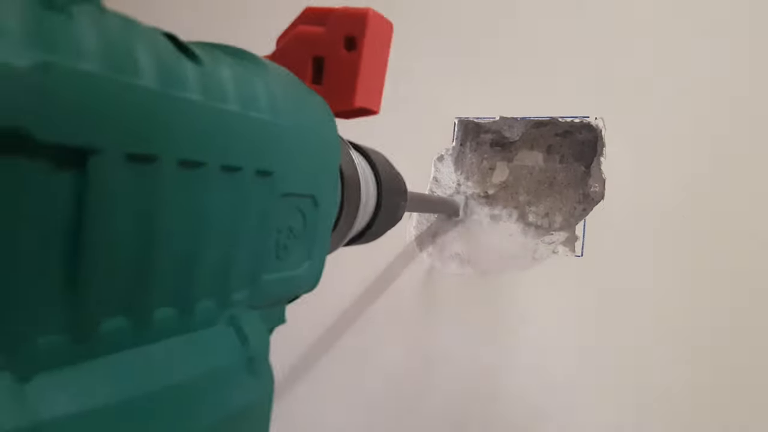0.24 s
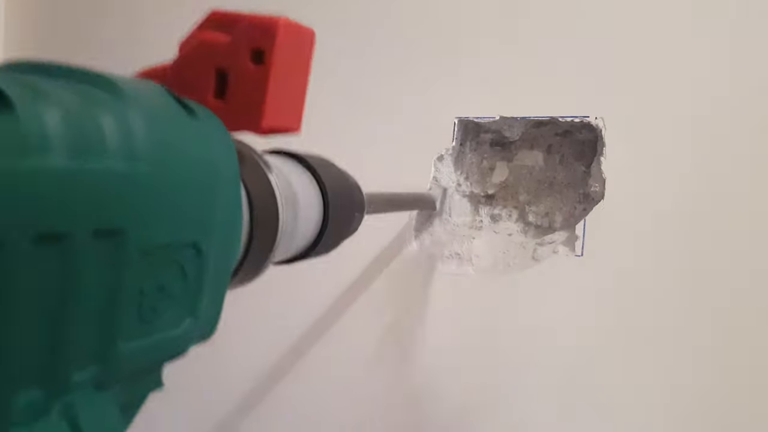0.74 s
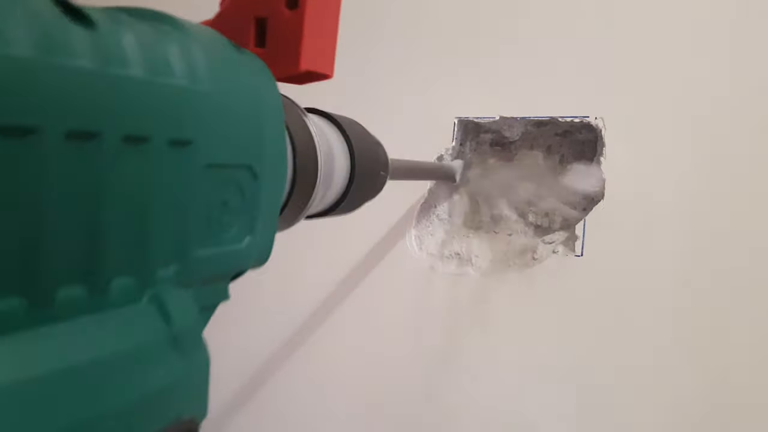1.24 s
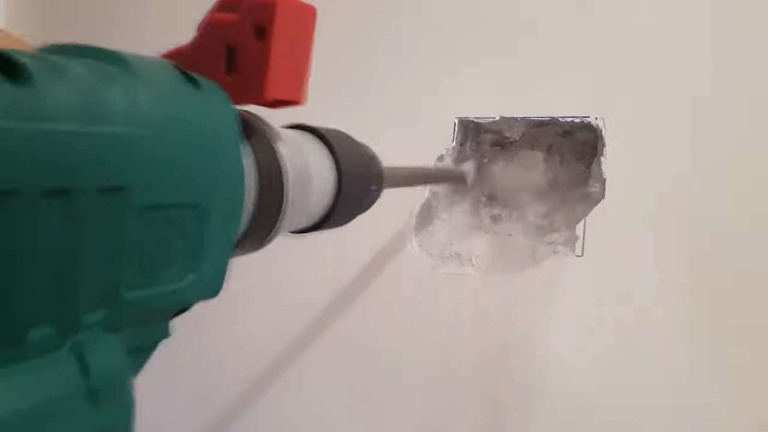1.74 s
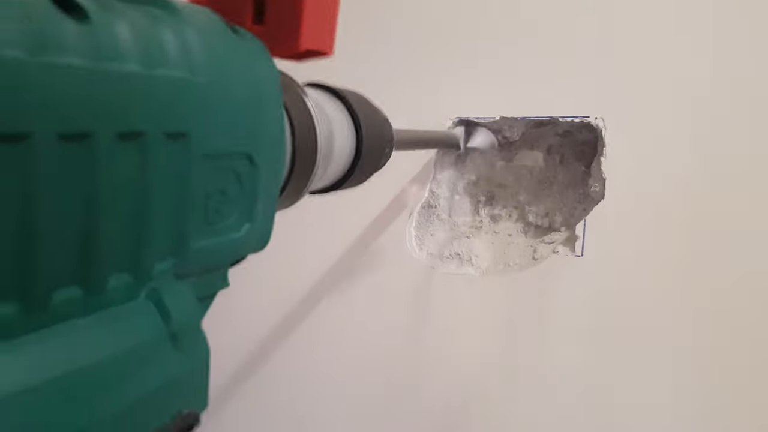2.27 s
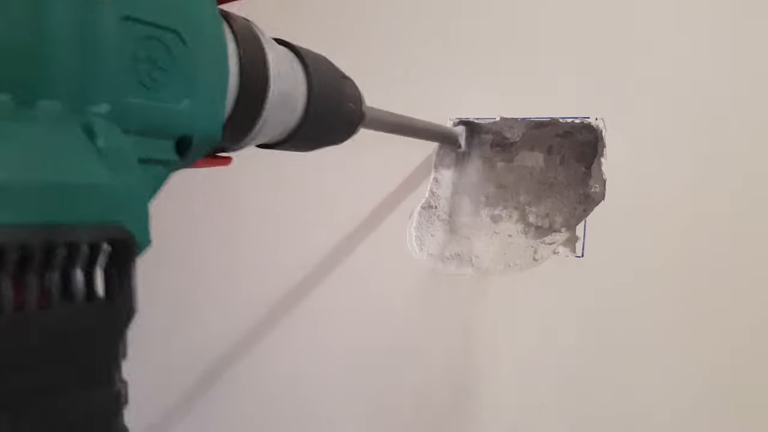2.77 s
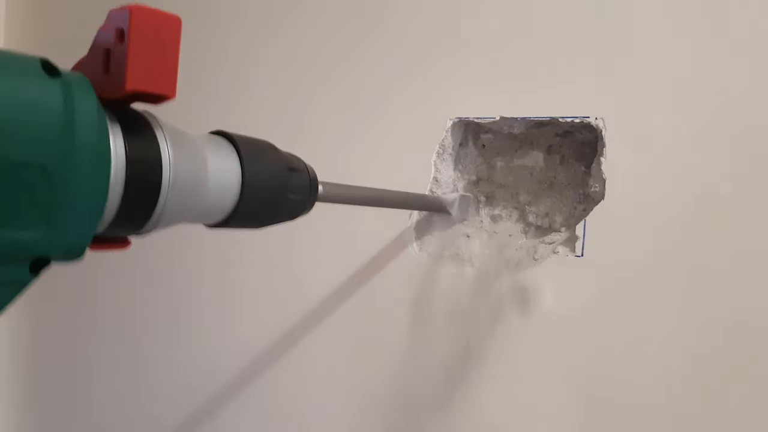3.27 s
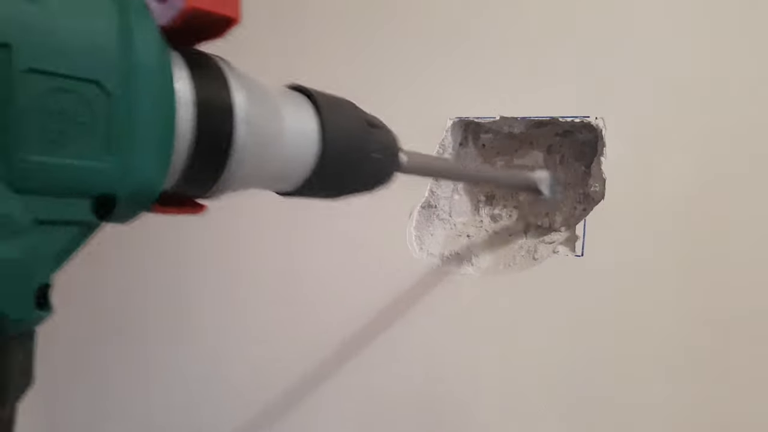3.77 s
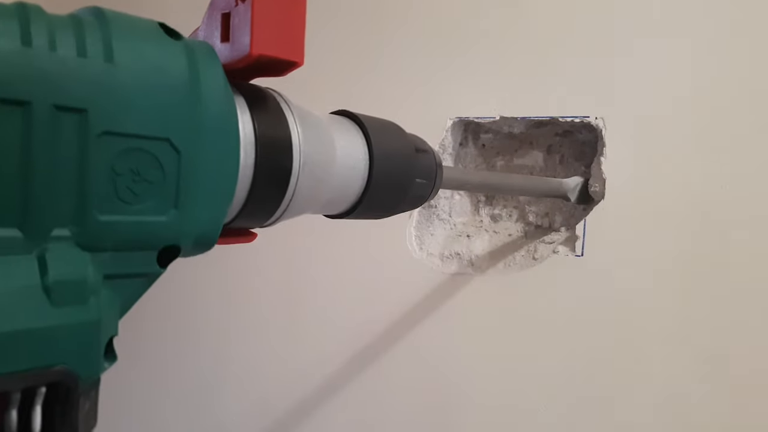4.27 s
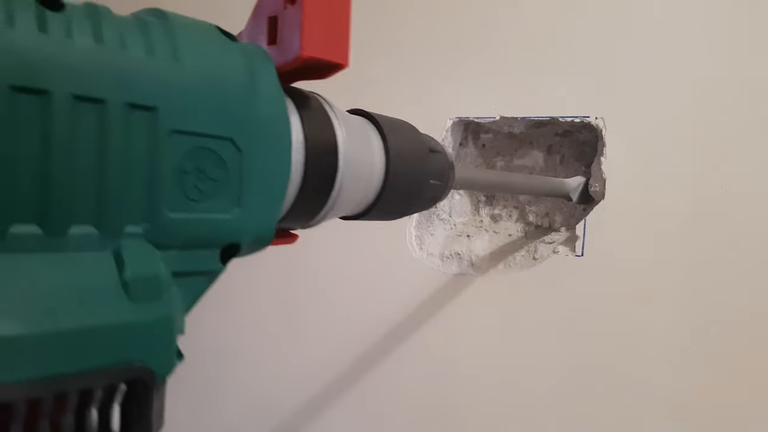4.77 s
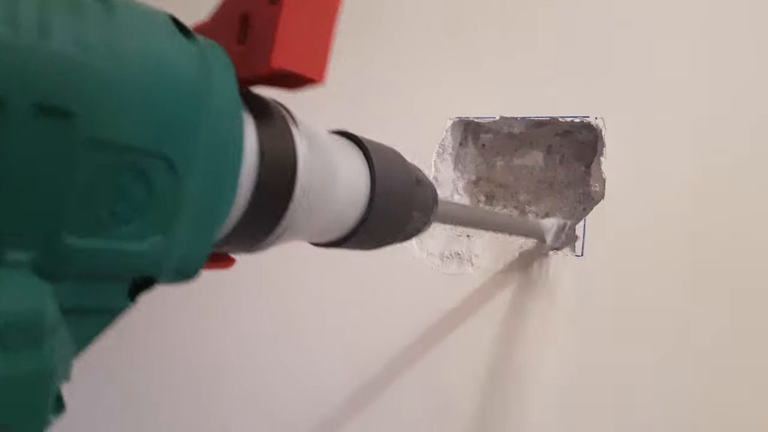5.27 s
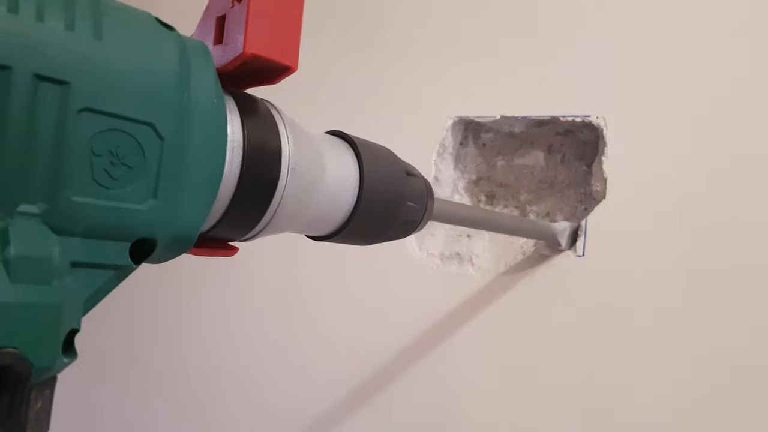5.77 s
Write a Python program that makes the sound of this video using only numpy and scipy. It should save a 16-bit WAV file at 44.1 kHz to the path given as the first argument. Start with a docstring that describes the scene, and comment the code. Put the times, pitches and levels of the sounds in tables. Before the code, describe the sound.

Close stereo sound of an electric rotary hammer chiselling a plastered masonry wall in a small bare room. Hammering begins at once, roughly forty to sixty hard blows a second, with bright steel ring, blunt thuds, low boom and gritty crushing; pieces snap off sharply until about 0.65 s. The whine peaks near 0.8 s, then slides down with the fan hiss. A few blows from 1.24 s lead into a second burst, 1.33 to 1.95 s, with a loud snap at 1.7. Lighter, slowing blows continue to 2.5 s, then the strongest burst runs to 3.27, cracking heavily around 2.95 to 3.1. The motor coasts down, whirring and rattling. The tip skips and clatters from 3.8 s; separate blows from 4.13 slow from about twenty-five to ten a second, ending near 5.0. Loose gears knock dully and irregularly, the dulling whirr fading until 6 s over a faint hum.

```python
"""Bare room, plastered wall: a rotary hammer chisels it, held close to a pair of microphones.
Motor speed follows three trigger pulls; a commutator whine with overtones and dulling fan hiss follow that speed.
Bursts strike once per crank turn, other blows are listed one by one; each rings the steel and thuds the wall.
Shaped noise makes crushing masonry and gear rattle; resonators make the plastic shell.
Snaps, bounces, slack-gear knocks, room echoes and a faint hum complete it."""
import sys
import numpy as np
from scipy import signal
from scipy.fft import rfft, irfft, next_fast_len
from scipy.io import wavfile
from scipy.ndimage import uniform_filter1d

SR = 44100
rng = np.random.default_rng(int(sys.argv[2]) if len(sys.argv) > 2 else 0)


def bounce(signal):
    """Save signal as a 16-bit WAV file at the path given by the first command-line argument."""
    frames = np.transpose(np.atleast_2d(signal))
    limited = np.clip(frames, -1, 1)
    pcm = np.round(limited * 32767).astype(np.int16)
    wavfile.write(sys.argv[1], SR, pcm)


N = 265465

# trigger pulls: pulled_s, released_s
TRIGGER_PULLS = [(.074, .812), (1.341, 1.791), (2.491, 3.221)]
# tip pressed on the wall: start_s, end_s, braking_hz_per_s
PRESSES = [(.05, .66, 6630), (1.36, 1.95, 5240), (2.04, 2.5, 600), (2.5, 3.27, 6590), (4.12, 5.03, 820)]
# commutator whine: pitch_hz, level_db
WHINE_LEVELS = [(450, -62), (900, -53), (1900, -61), (3000, -61), (5200, -46), (7000, -44), (8300, -39),
                (9700, -36), (10500, -38), (11100, -33), (12000, -37)]
# fan hiss at full speed: frequency_hz, level_db
HISS_SPECTRUM = [(700, 5.5), (1500, -4.5), (3000, 6.5), (5000, 1), (7000, 1), (9500, 1.5), (12500, 11),
                 (15000, -7.5)]
# resonances of the plastic housing: frequency_hz, width_hz, level_db, hollowness_share
HOUSING_MODES = [(118, 57, -13, 0.38), (563, 83, 2, -0.47), (636, 187, 3, 0.96), (970, 930, -8, -0.32),
                 (1413, 330, 2.5, -0.89), (1830, 138, 5.5, -1.5), (2156, 296, 10, 0.34),
                 (2452, 130, 10.5, 0.029), (2760, 430, 4, 0.79), (3054, 750, -1.5, 0.52),
                 (3840, 620, -4.5, -0.13), (5000, 6500, -11, 0.92)]
# hollowness of the shell's colour: time_s, hollowness_db
HOLLOWNESS = [(0, 18.5), (.7, -4.5), (1.3, 2), (2.0, -4.5), (2.5, -2.5), (3.2, -4.5), (3.45, 3.5), (3.8, 4),
              (4.05, -3.5), (4.3, -1.5), (5.0, -2.5), (6.02, -4)]
# slack gear teeth knocking as the motor stops: time_s, level_db
GEAR_KNOCKS = [(4.467, -33), (4.5146, -15), (4.5694, -12), (4.59, -28), (4.6134, -26), (4.6289, -17),
               (4.6538, -20), (4.678, -17), (4.6927, -12), (4.7376, -30), (4.7591, -24), (4.778, -25),
               (4.7995, -17), (4.8437, -27), (4.876, -11.5), (4.906, -20), (4.9516, -15), (4.989, -23),
               (5.026, -37), (5.0824, -21), (5.1234, -27), (5.158, -13), (5.1814, -17), (5.269, -17),
               (5.296, -16), (5.3951, -19), (5.422, -18), (5.504, -18), (5.5553, -18), (5.58, -11),
               (5.734, -23), (5.757, -16), (5.775, -28), (5.902, -22), (5.9374, -33), (5.9896, -35)]
# tool turned: time_s, left_over_right_db, housing_gain_db
TOOL_TURN = [(0, 0.5, -7.5), (1.1, 2.5, 5), (1.6, 0.5, -9), (2.15, 2.5, 8.5), (2.7, 0.5, 0), (3.3, 1.5, 6),
             (3.95, 4, 6.5), (4.6, 2.5, 10.5), (6.02, 3.5, 12)]
# how hard the wall is worked: time_s, boom_level_db
EFFORT = [(0.0, -31), (0.17, -27.5), (0.62, -25), (0.7, -30.5), (1.22, -37.5), (1.46, -28), (1.51, -26.5),
          (1.83, -25.5), (1.99, -38.5), (2.2, -49), (2.7, -24), (3.07, -29.5), (3.22, -26.5), (3.25, -29.5),
          (3.6, -40), (4.24, -27), (5.35, -57), (5.73, -45), (5.8, -54.5), (6.02, -61.5)]
# low boom of the wall: frequency_hz, relative_db
BOOM_SPECTRUM = [(25, -24), (60, -3.5), (120, 0), (250, 2), (400, 6.5), (600, -1), (1200, -50)]
# crushed masonry: frequency_hz, relative_db
MASONRY_SPECTRUM = [(100, -47), (300, -11), (500, -6), (750, 0), (1200, 0.5), (2000, -1), (4000, -14),
                    (9000, -73)]
# low hum: frequency_hz, level_db
HUM_TONES = [(140.0, -64.5), (285.3, -63), (393.0, -61.5)]
# steady hammering: first_blow_s, end_s, ring_level_db, thud_level_db (at full effort)
BURSTS = [(0.053, .66, -22.5, -15.5), (1.333, 1.94, -23.5, -15), (2.53, 3.27, -20.5, -17)]
# blows listed one by one, while the motor runs up or slows:
# time_s, ring_level_db, thud_level_db, thud_hz, thud_cycles, left_over_right_db
LISTED_BLOWS = [(1.2366, -24, -27, 840, 4.6, 0), (1.261, -24, -32, 996, 5, -2),
                (1.284, -28, -22, 910, 5.2, -2), (1.307, -20, -17.5, 405, 2, 5),
                (1.953, -25, -25, 604, 2.8, 0), (1.9745, -29, -23, 800, 4.7, 6),
                (1.996, -35, -14, 1100, 3.2, 0), (2.018, -30, -27, 900, 4, 0),
                (2.0403, -23, -18, 670, 4.4, -1), (2.061, -27, -9.5, 1460, 5.5, -3),
                (2.084, -24, -15, 1000, 6.6, 1), (2.108, -20.5, -22, 900, 4, 0),
                (2.131, -30, -16, 960, 5.3, 13), (2.157, -39, -17, 865, 6.8, 1.5),
                (2.182, -26, -19, 900, 7.4, 6), (2.209, -36, -18, 950, 7.7, 12),
                (2.2356, -39, -23, 910, 7, 5), (2.263, -28, -29, 636, 4.8, 0),
                (2.291, -28, -17.5, 654, 3.2, 4), (2.3187, -21.5, -10, 1110, 5.5, 0),
                (2.349, -26, -6.5, 1090, 5.1, -4), (2.38, -22.5, -30, 690, 4.4, 0),
                (2.4118, -28, -14, 645, 1.4, -2), (2.444, -26, -22, 1600, 3.6, -2),
                (2.4788, -23, -16, 565, 1.8, -10), (2.5074, -17, -8, 1300, 3, -9),
                (4.134, -23, -26, 654, 10, 0), (4.1706, -21, -15, 1000, 5.4, 8),
                (4.2082, -24, -17, 650, 6.1, 9), (4.2491, -23.5, -12, 850, 8, 8),
                (4.2904, -20.5, -14, 690, 9.3, 6), (4.334, -21, -10, 990, 5, 10),
                (4.381, -17, -10.5, 1040, 6.5, 3), (4.429, -22.5, -11.5, 970, 7.8, 0),
                (4.4794, -26, -31, 523, 8.3, -5), (4.533, -27, -20, 1100, 16, -4),
                (4.5872, -24.5, -28, 1140, 11, 2), (4.6485, -32, -21, 1000, 19, -5),
                (4.7105, -26, -15.5, 920, 15, -2), (4.7762, -28, -17, 850, 8.8, 0),
                (4.8442, -26, -19.5, 805, 11, -6), (4.9282, -35, -19, 815, 24, 0),
                (5.025, -50, -21.5, 780, 26, -2)]
# tip loose, steel rings freely: start_s, end_s
LOOSE_SPANS = [(.05, .1), (.5, .66), (1.33, 1.6), (1.72, 1.87), (2.53, 2.62)]
# chisel modes: frequency_hz, level_db, t60_s
CHISEL_MODES = [(12490, -3, .04), (12590, -9, .025), (12760, -10, .025), (13100, -12, .02),
                (13500, -10, .02), (14200, -12, .015), (11830, -12, .02), (10780, -13, .02),
                (8800, -16, .02), (8200, -15, .02)]
# tip bounces or skips without a stroke: time_s, level_db, thud_hz, thud_cycles
BOUNCES = [(1.439, -8.5, 460, 4.4), (1.451, -16, 447, 5.4), (1.465, -21, 410, 7.1), (2.329, -17, 1150, 6),
           (2.401, -15, 2100, 5.4), (2.434, -14, 2400, 14), (3.83, -17, 806, 1.4), (3.872, -18, 700, 4),
           (3.913, -17, 490, 6.5), (3.921, -8.5, 1260, 5), (3.936, -12.5, 900, 2.1),
           (3.959, -16.5, 686, 17), (3.974, -24, 700, 10), (3.986, -17, 704, 5.3), (3.996, -17, 680, 5.2),
           (4.006, -15, 720, 6.7), (4.015, -15.5, 570, 5.6), (4.052, -15.5, 695, 13), (4.075, -23, 655, 5),
           (4.081, -17, 800, 5.7), (4.095, -18, 654, 7.4), (4.104, -9.5, 1490, 11), (4.118, -18, 650, 4.8),
           (4.127, -17, 750, 7.3), (4.186, -10.5, 1400, 9), (4.197, -17, 755, 11), (4.244, -13, 623, 5.4),
           (4.285, -19, 600, 6.5), (4.447, -24, 403, 5), (4.505, -19.5, 485, 4.7), (4.667, -30, 397, 3.8),
           (4.7212, -15, 900, 10), (4.787, -17.5, 785, 9), (4.853, -17, 1220, 9), (4.8728, -29, 650, 7.2)]
# loud pieces of masonry snapping off: time_s, level_db, thud_hz, left_over_right_db
SNAPS = [(0.0796, -8, 3130, -2), (0.103, -15, 990, 0), (0.1246, -14.5, 560, 4), (0.1475, -10, 1610, 4),
         (0.1646, -9, 2870, -3), (0.1831, -12, 2240, -3), (0.292, -10, 990, 1), (0.4194, -8.5, 790, 4),
         (0.5971, -11, 900, -1), (0.6308, -6, 2990, -1), (0.768, -14, 1160, 9), (1.351, -12, 2370, 5),
         (1.3803, -14, 520, 4), (1.4587, -15, 560, -1), (1.4786, -14, 776, -1), (1.495, -8, 2300, 1),
         (1.549, -12, 1490, 0), (1.6863, -9, 890, 1), (1.6993, -2, 2235, 2), (1.839, -6, 1440, 1),
         (1.8735, -15, 650, -1), (1.8932, -15, 2350, 0), (2.5301, -20, 730, 4), (2.5537, -14, 860, -11),
         (2.5735, -12, 1530, -2), (2.5937, -17, 1740, 5), (2.6125, -13, 1310, 0), (2.6322, -9, 839, 3),
         (2.6513, -11, 780, 4), (2.6864, -11, 1010, -8), (2.9422, -4, 1820, -5), (2.9689, -3, 1690, -4),
         (2.9858, -3, 2110, 4), (3.0698, 0, 2090, 5), (3.1895, -6, 1660, 3), (3.2241, -13, 1590, 7)]

# motor speed is counted as whine pitch
WHINE_CYCLES_PER_BLOW = 188   # commutator bars per crank turn
START_HZ, UNIT_HZ, FULL_HZ = 6900, 10000, 11400
MOTOR_STEP_S = .002
DRIVE_HZ_PER_S, DRIVE_FALL_POWER = 24480, 3.35   # pull at unit speed; power of speed it falls with
FRICTION_HZ_PER_S, BEARING_HZ_PER_S, FAN_HZ_PER_S = 812, 4570, 3840   # drag: constant, by speed, by speed squared
WHINE_DAMPING_DB, WHINE_DAMPING_MOST_DB = 3, 9   # lost while pressed: at full speed, limit at low speed
OVERTONE_HZ, OVERTONE_OCTAVES, OVERTONE_DB = 3550, .17, 7.5   # shell window that lets overtones out
UPPER_HZ, UPPER_DB = 5000, -4   # second, weaker window
DULLING_DB, DULLEST_OCTAVES = 3.5, 2.13   # hiss loss per octave of treble and of lost speed; limit of lost speed
# layers: level_db at full speed and effort, share of the effort's swing, db_per_octave of speed
CRUSH, RATTLE, AIR = (-21, 0.29, 3.85), (-26.5, 0.27, 2.35), (-23.5, 0.11, 4.5)
FULL_BOOM_DB = -27
NEAR, NEAR_PER_OCTAVE = 0.43, 0.098   # noise share common to both ports at full speed; grows as speed falls
PORT_LAG_SAMPLES, LONE_LAG_SAMPLES = 13, 4   # right after left: in general, for lone thuds
BURIED_DB = -12   # ring of the steel while the tip is buried
RUN_CYCLES, SNAP_CYCLES = 5.2, 4.2
REBOUND_DB, REBOUND_SPREAD_DB = -4.5, 5.5   # second landing between strokes of a burst
CRACK_HZ, CRACK_DB = 2100, -5   # sharp edge on every thud, relative to the thud
PUSH_S, PUSH_DB, PUSH_LOSS_DB = 0.0013, -0.5, 3.5   # one-sided shove of air; loss per thud cycle
RUMBLE_DB = -64
ROOM_T60_S, ROOM_DB, WALL_CUT_HZ = 0.095, -7, 16000
CUTOFF_HZ = 15450


def from_db(db):
    """Gain of a dB value."""
    return 10 ** (np.asarray(db) / 20)


def rms_one(x):
    """Scaled to rms 1."""
    return x / np.sqrt(np.mean(x ** 2) + 1e-20)


def filtered(x, order, hz, kind):
    """Butterworth filter."""
    return signal.sosfilt(signal.butter(order, hz, kind, fs=SR, output="sos"), x)


def in_time(rows):
    """Columns of a curve, one value a sample."""
    s, *columns = np.transpose(rows)
    return [np.interp(np.arange(N) / SR, s, c) for c in columns]


def at_hz(points, hz):
    """A spectrum read on a log frequency axis."""
    point_hz, level_db = np.array(points).T
    return np.interp(np.log(hz), np.log(point_hz), level_db)


def drift(rate):
    """Slow random wander of rms 1, faster for a higher rate."""
    r = np.exp(-80 * np.pi * rate / SR)   # one step per 40 samples
    white = rng.standard_normal(N // 40 + 2002)
    slow = signal.lfilter([1], [1, -2 * r, r * r], white)[2000:]
    return np.interp(np.arange(N) / 40, np.arange(len(slow)), rms_one(slow))


def ring(clicks, hz, t60_s):
    """Two-pole resonator: a unit click rings a sine of height about 1, with little far below it."""
    r, w = from_db(-60 / (t60_s * SR)), 2 * np.pi * hz / SR
    return signal.lfilter([.5, 0, -.5], [1, -2 * r * np.cos(w), r * r], clicks + 1e-18)


def dying(at, level_db, t60_s):
    """Envelope that jumps at the given samples and decays exponentially."""
    clicks = np.zeros(N)
    clicks[at.astype(int)] = from_db(level_db)
    return signal.lfilter([1], [1, -from_db(-60 / (t60_s * SR))], clicks + 1e-18)


def later(x):
    """The same sound at left and, a moment later, right."""
    return np.stack([x, np.roll(x, PORT_LAG_SAMPLES)])


def grit(direct, grain_db):
    """Stereo white grains of uneven size: a direct share common to both ports, the rest scattered."""
    noise = rng.standard_normal((3, N)) * from_db(grain_db * np.minimum(rng.exponential(1, N), 4))
    direct = np.clip(direct, 0, 1)
    return np.sqrt(direct) * later(noise[0]) + np.sqrt(1 - direct) * noise[1:]


def hum():
    """Low tones wavering in level over a faint rumble, stronger at the left port."""
    t = np.arange(N) / SR
    rumble = from_db(RUMBLE_DB) * rms_one(filtered(grit(.6, 1.5), 2, 90, "low"))
    tones = sum(from_db(db + 2.5 + 3.1 * drift(4.3)) * np.sin(2 * np.pi * hz * t) for hz, db in HUM_TONES)
    return (rumble + tones) * from_db([[2.0], [-2.0]])


def motor():
    """Speed integrated from drive, drag and braking; whine level follows pitch and load."""
    t, hz = np.arange(0, N / SR + 2 * MOTOR_STEP_S, MOTOR_STEP_S), [START_HZ]
    driven = sum((t > on) & (t < off) for on, off in TRIGGER_PULLS)
    braking = sum(brake * ((t > start) & (t < end)) for start, end, brake in PRESSES)
    for on, brake in zip(driven[1:], braking[1:]):
        u = hz[-1] / UNIT_HZ
        drag = FRICTION_HZ_PER_S + BEARING_HZ_PER_S * u + FAN_HZ_PER_S * u * u + brake
        drive = on * DRIVE_HZ_PER_S / u ** DRIVE_FALL_POWER
        hz.append(hz[-1] + MOTOR_STEP_S * (drive - drag))
    hz = np.array(hz)
    pressed = uniform_filter1d((braking > 0) * 1.0, size=60)
    damped_db = np.minimum(WHINE_DAMPING_DB * (FULL_HZ / hz) ** 2, WHINE_DAMPING_MOST_DB) * pressed
    return in_time(np.transpose([t, hz, at_hz(WHINE_LEVELS, hz) - damped_db]))


def whine(whine_hz, whine_db):
    """Wavering commutator tone; overtones surface as they slide through the shell's windows."""
    hz = whine_hz * (1 + .005 * drift(60))
    phase = 2 * np.pi * np.cumsum(hz) / SR
    low_loss_db = 12 * np.minimum(np.log2(hz / OVERTONE_HZ), 0)
    tones = from_db(2.5 * drift(14) - 1.5 + low_loss_db) * np.sin(phase)
    for k in range(2, 12):
        fading_db = 10 * (np.log2(k * hz / OVERTONE_HZ) / OVERTONE_OCTAVES) ** 2
        main_db = OVERTONE_DB - np.minimum(fading_db, 9 + fading_db / 4)
        upper_db = UPPER_DB - 10 * (np.log2(k * hz / UPPER_HZ) / OVERTONE_OCTAVES * 2) ** 2
        tones += from_db(np.maximum(main_db, upper_db) + 2 * drift(20)) * np.sin(k * phase)
    return from_db(whine_db) * np.stack([tones, tones])   # motor equally far from both ports


def hiss(whine_hz, hiss_db):
    """Fan noise in bands up to half an octave wide, duller as the fan slows."""
    out, edges_hz = 0, 500 * 2 ** np.arange(0, 5.6, .5).clip(0, 5.2)
    slowed_octaves = np.maximum(np.log2(whine_hz / FULL_HZ), -DULLEST_OCTAVES)
    white = [grit(0.016, 2.1), grit(0.015, 0.36)]   # alternate bands
    for k, (low, high) in enumerate(zip(edges_hz, edges_hz[1:])):
        hz = np.sqrt(low * high)
        dulling_db = DULLING_DB * slowed_octaves * max(np.log2(hz / 4000), 0)
        gain = from_db(at_hz(HISS_SPECTRUM, hz) + dulling_db + 1.63 * drift(13.6))
        out = out + gain * filtered(white[k % 2], 2, [low, high], "band")
    return from_db(hiss_db + 2.0) * out


def housing(blows, rattle_db, near):
    """Gear teeth chatter in clumps and some knock alone; the plastic shell's modes ring with both."""
    knock_s, knock_db = np.array(GEAR_KNOCKS).T
    chatter = grit(near, 4.54) * from_db(1.8 * drift(23))
    chatter = chatter * (1 + dying(blows[:, 0], 0.67, 0.0059))   # every blow shakes the gears
    chatter = chatter * (1 + dying(knock_s * SR, 0.74, 0.028))   # so does every knock
    knocks, rattle, knocked = np.zeros(N), 0, 0
    knocks[(knock_s * SR).astype(int)] = from_db(knock_db)
    hollow_db, = in_time(HOLLOWNESS)
    for hz, width_hz, level_db, share in HOUSING_MODES:
        t60_s = 2.2 / width_hz
        mode = rms_one(ring(ring(chatter, hz, t60_s), hz, t60_s)) * np.sqrt(width_hz)
        rattle = rattle + from_db(level_db + share * hollow_db + drift(4.2)) * mode
        knocked = knocked + from_db(level_db) * ring(knocks, hz, t60_s)
    knocked = filtered(knocked, 3, [2000, 2750], "band")   # light, blunt taps
    ticks = grit(0.4, 2.0) * dying(knock_s * SR, knock_db - 16.0, .012)
    ticks = filtered(ticks, 2, [3000, 9000], "band")
    return from_db(rattle_db) * rms_one(rattle) + from_db(-14) * later(knocked) + ticks


def crushing(blows, spectrum, level_db, direct):
    """Coarse coloured grit, steady but surging after each blow."""
    surge = 1 + dying(blows[:, 0], 0, 0.04)
    size = next_fast_len(N)
    bin_hz = np.maximum(np.arange(size // 2 + 1) * SR / size, 1)
    colour = from_db(at_hz(spectrum, bin_hz))
    noise = grit(direct, 3.3) * surge * from_db(1.84 * drift(72))
    return from_db(level_db) * rms_one(irfft(rfft(noise, size) * colour, size)[:, :N])


def all_blows(whine_hz, effort_db):
    """Some blows as listed; in a burst the crank strikes once per turn, unevenly.

    Columns: at_sample, ring_db, thud_db, thud_hz, thud_cycles, left_over_right_db, lag_samples, damping_db."""
    rows = [(s * SR, *rest, LONE_LAG_SAMPLES, 0) for s, *rest in LISTED_BLOWS]
    turns = np.cumsum(whine_hz) / WHINE_CYCLES_PER_BLOW / SR
    for first_s, end_s, ring_db, thud_db in BURSTS:
        start, stop = turns[int(first_s * SR)], turns[int(end_s * SR)]
        at = np.interp(np.arange(start, stop), turns, np.arange(N))
        luck = rng.standard_normal((60, 5))[:len(at)]
        loose = sum((at > s * SR) & (at < until * SR) for s, until in LOOSE_SPANS)
        thud = thud_db + effort_db[at.astype(int)] - 1.5 + 1.1 * luck[:, 2]
        hz = 800 * np.exp(0.56 * luck[:, 3].clip(-1.1, 1.6))
        same = np.ones(len(at))
        rows += list(zip(at + 45 * luck[:, 0], ring_db + 2.0 * luck[:, 1], thud, hz, RUN_CYCLES * same,
                         3 * luck[:, 4], PORT_LAG_SAMPLES * same, BURIED_DB * (1 - loose)))
    return np.array(rows)


def chisel(blows):
    """Brief gritty contact rings the steel, differently each time, over a bright crack."""
    at, ring_db, damping_db = blows[:, 0], blows[:, 1], blows[:, 7]
    contact = grit(0.37, 2.4) * dying(at, ring_db + damping_db - 12.0, 0.0091)
    rings = sum(from_db(level_db) * ring(contact, hz, t60_s) for hz, level_db, t60_s in CHISEL_MODES)
    splinters = grit(0.021, 3.45) * dying(at, ring_db - 1.5, 0.031)
    return rings + filtered(splinters, 2, 2500, "high")


def rebound_rows(blows):
    """In a burst the tip lands again between strokes."""
    run = blows[blows[:, 6] == PORT_LAG_SAMPLES]
    luck = rng.standard_normal((len(run), 4))
    delay_s = (.009 + 0.00303 * luck[:, 0]).clip(.002, .02)
    level_db = run[:, 2] + REBOUND_DB + REBOUND_SPREAD_DB * luck[:, 1].clip(-2, 1.5)
    hz = 850 * np.exp(0.52 * luck[:, 2].clip(-1.5, 2))
    return zip(run[:, 0] + SR * delay_s, level_db, hz, run[:, 4], 3 * luck[:, 3], run[:, 6])


def thuds(blows):
    """Each blow, bounce, snap or rebound gives a few decaying cycles, a crack and a shove of air."""
    length = 1800
    out, t = np.zeros((2, N + length + 100)), np.arange(length) / SR
    bounces = [(s * SR, db, hz, cycles, 0, LONE_LAG_SAMPLES) for s, db, hz, cycles in BOUNCES]
    snaps = [(s * SR, db, hz, SNAP_CYCLES, pan_db, LONE_LAG_SAMPLES) for s, db, hz, pan_db in SNAPS]
    hits = [*blows[:, [0, 2, 3, 4, 5, 6]], *bounces, *snaps, *rebound_rows(blows)]
    push = np.sin(np.pi * np.minimum(t / PUSH_S, 1)) ** 2
    for at, thud_db, hz, cycles, pan_db, lag in hits:
        swell = (1 - np.exp(-t * hz * 2.5)) ** 2 * from_db(-60 * t * hz / max(cycles, 2))
        body = np.sin(2 * np.pi * hz * t) * swell / swell.max()
        crack_fade = from_db(CRACK_DB - 60 * t * CRACK_HZ / 4)
        crack = crack_fade * np.sin(2 * np.pi * CRACK_HZ * rng.uniform(.7, 1.4) * t)
        shove = from_db(PUSH_DB - PUSH_LOSS_DB * cycles) * push
        pulse = body + np.roll(crack - shove, int(SR / hz / 2))   # half a cycle in
        left, right = int(at), int(at + lag)
        out[0, left:left + length] += from_db(thud_db + pan_db / 2) * pulse
        out[1, right:right + length] += from_db(thud_db - pan_db / 2) * pulse
    return filtered(out[:, :N], 2, 70, "high")


def room(x):
    """Six feedback delays a side, duller on every round."""
    out, dull = np.zeros((2, N)), np.exp(-2 * np.pi * WALL_CUT_HZ / SR)
    for k, lag in enumerate((rng.uniform(0.0091, .04, 12) * SR).astype(int)):
        loop, gain, state = x.copy(), from_db(-60 * lag / SR / ROOM_T60_S), [0.]
        for i in range(lag, N, lag):
            back, state = signal.lfilter([gain * (1 - dull)], [1, -dull], loop[i - lag:i], zi=state)
            loop[i:i + lag] += back[:N - i]
        out[k % 2] += (loop - x) * (-1) ** (k // 2)
    return out


def scene():
    """Hammer, wall and motor, a little to the left; blows and whine feed the room."""
    whine_hz, whine_db = motor()
    boom_db, = in_time(EFFORT)
    pan_db, turned_db = in_time(TOOL_TURN)
    effort_db, octaves = boom_db - FULL_BOOM_DB, np.log2(whine_hz / FULL_HZ)
    crush_db, rattle_db, hiss_db = (db + share * effort_db + slope * octaves
                                    for db, share, slope in (CRUSH, RATTLE, AIR))
    near = NEAR - NEAR_PER_OCTAVE * octaves
    blows = all_blows(whine_hz, effort_db)
    struck = chisel(blows) + thuds(blows) + whine(whine_hz, whine_db + np.clip(turned_db, 0, 5))
    boom = crushing(blows, BOOM_SPECTRUM, boom_db - 1.5, direct=0.025 + 0.5 * (near - NEAR))
    masonry = crushing(blows, MASONRY_SPECTRUM, crush_db, direct=near - .15)
    rattle = housing(blows, rattle_db + turned_db, near)
    tool = struck + boom + masonry + rattle + hiss(whine_hz, hiss_db)
    placed = tool * from_db(np.stack([pan_db, -pan_db]) / 2 + 2.5)
    return placed + from_db(ROOM_DB) * room(struck[0]) + hum()


def record(dry):
    """Peaks are rounded, the top is cut."""
    rounded = 1.1 * np.tanh(dry / 1.1)
    return signal.sosfilt(signal.ellip(12, .5, 90, CUTOFF_HZ, fs=SR, output="sos"), rounded)


dry = scene()
out = record(dry)
bounce(out)
```